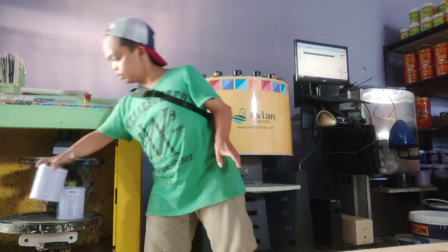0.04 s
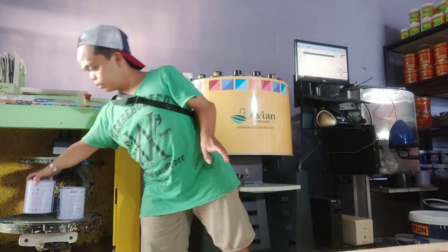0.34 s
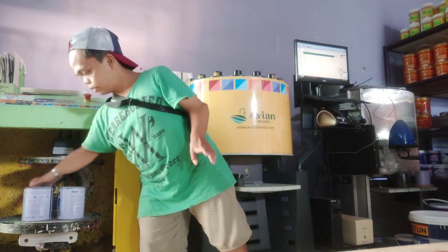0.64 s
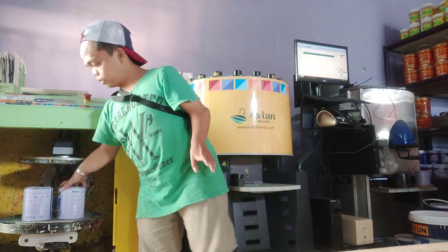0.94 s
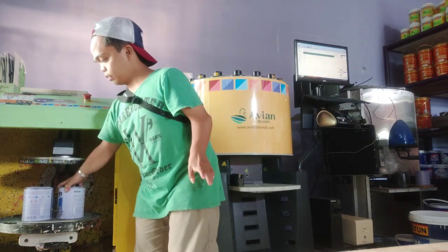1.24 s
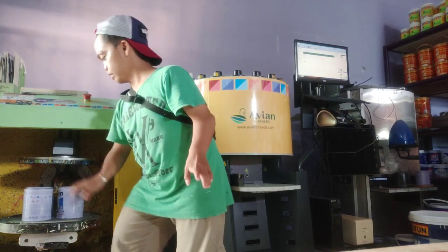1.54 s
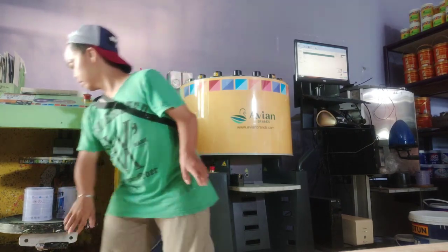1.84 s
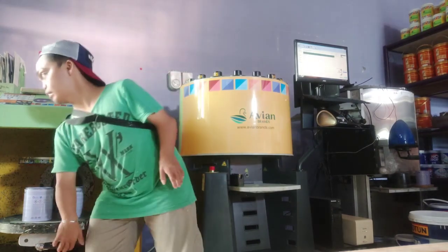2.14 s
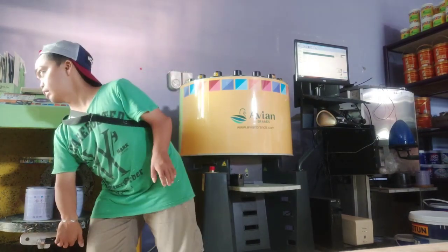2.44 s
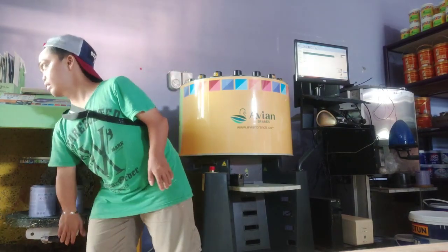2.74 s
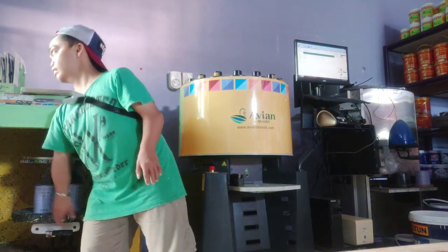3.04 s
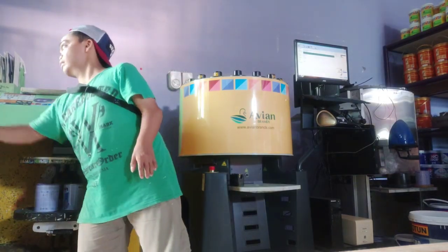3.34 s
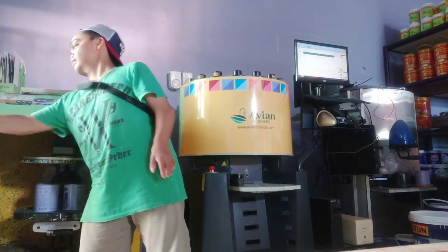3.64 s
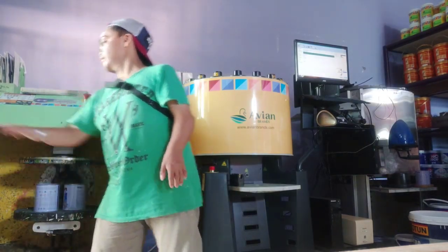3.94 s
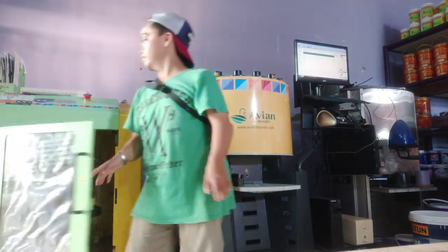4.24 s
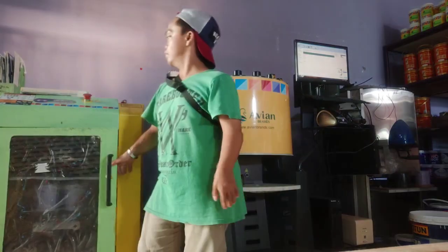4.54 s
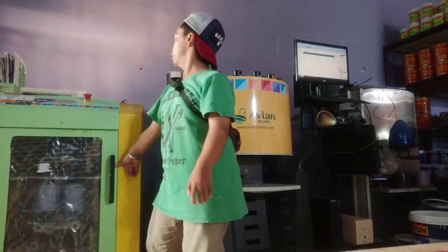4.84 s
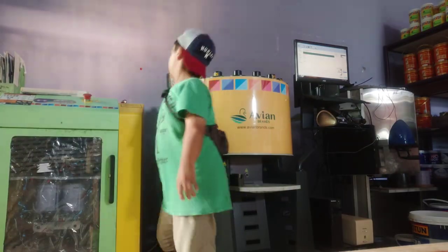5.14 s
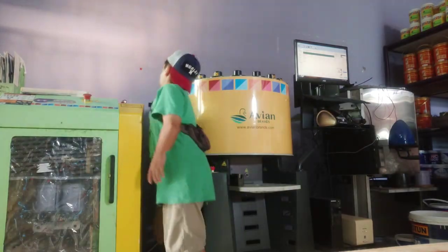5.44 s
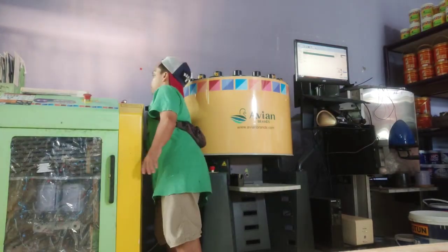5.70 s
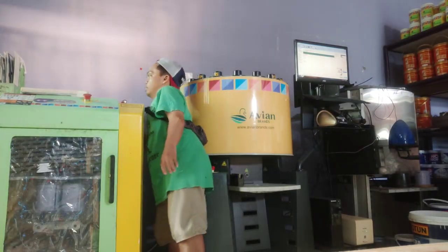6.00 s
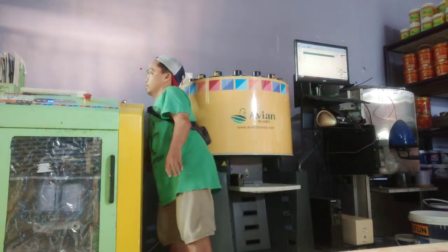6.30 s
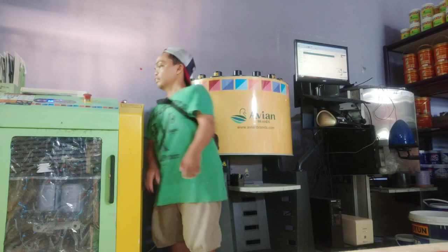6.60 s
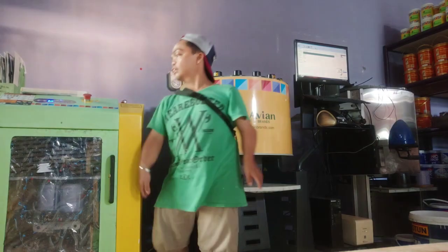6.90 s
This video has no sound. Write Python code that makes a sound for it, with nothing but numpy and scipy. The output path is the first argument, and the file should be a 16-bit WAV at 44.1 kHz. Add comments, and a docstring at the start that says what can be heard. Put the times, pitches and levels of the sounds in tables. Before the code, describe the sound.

A paint can clanks onto a steel plate, a clamp screws down and bangs tight, then a metal door slams and a switch clacks.

```python
"""A paint can clanks onto the steel plate of a shaker in a hard-walled shop. The clamp screw hums and
rasps as it is wound down, its loose handle clinks, and the clamp bangs tight. The sheet-metal door
slams, then a switch squeaks and clacks behind the machine. Each blow is a noisy clash over ringing modes.
Small birds chirp faintly outside, clothes rustle, and a noise suppressor pulls the quiet parts down."""
import sys
import numpy as np
from scipy import signal
from scipy.fft import rfft, irfft
from scipy.io import wavfile
from scipy.ndimage import uniform_filter1d

SR = 44100
rng = np.random.default_rng(int(sys.argv[2]) if len(sys.argv) > 2 else 0)


def put_to_file(sound):
    """Save the sound as 16-bit audio at rate SR, in the file named by the first command-line argument."""
    columns = np.atleast_2d(sound).T  # one column per channel
    safe = np.clip(columns, -1, 1)
    whole_steps = np.round(safe * 32767)
    wavfile.write(sys.argv[1], SR, whole_steps.astype(np.int16))


N = 315756
TIME = np.arange(N) / SR
RING = np.arange(2 * SR) / SR  # time after a blow

# Knocks of the clamp and clacks of the switch: t/s, level/dB, thud/dB, brightness/dB
CLAMP_KNOCKS = [(2.604, -28, -2, 10.5), (2.622, -33.5, 10, 2.5), (3.2255, -14.5, -10.5, -0.5),
                (3.241, -17.5, 2, -1.5)]
SWITCH_CLACKS = [(6.119, -39, -1.5, 5), (6.131, -32, -7, 2), (6.141, -34.5, 13, 0.5)]


def amp(db):
    """Decibels to gain."""
    return 10 ** (np.asarray(db) / 20)


def along(points, hz):
    """Read (f/Hz, value) points on a log frequency axis."""
    f, v = np.transpose(points)
    return np.interp(np.log(hz + 1), np.log(f + 1), v)


def wobble(rate, size):
    """A random curve with `rate` knots a second."""
    knots = rng.standard_normal(4096)
    return np.interp(np.arange(size) * rate / SR, np.arange(len(knots)), knots)


def swell(start_s, hold_s, attack_s, release_s):
    """Envelope that climbs 60 dB over the attack, holds from start_s and falls 60 dB over the release."""
    t = TIME - start_s
    return amp(-60 * (np.maximum(-t, 0) / attack_s + np.maximum(t - hold_s, 0) / release_s))


def add(track, s, sound):
    """Mix a sound into the track at time s."""
    part = track[round(s * SR):][:len(sound)]
    part += sound[:len(part)]


def coloured(x, spectrum, tilt=((1, 0), (2, 0)), size=8192):
    """Minimum-phase EQ: the spectrum scaled to unit energy, then tilted."""
    hz = np.fft.rfftfreq(size, 1 / SR)
    shape = amp(along(spectrum, hz))
    gain = shape / np.sqrt(np.mean(shape ** 2) + 1e-20) * amp(along(tilt, hz))
    cepstrum = irfft(np.log(gain + 1e-6))
    fold = np.r_[1, np.full(size // 2 - 1, 2), 1, np.zeros(size // 2 - 1)]
    impulse = irfft(np.exp(rfft(cepstrum * fold)))
    return signal.fftconvolve(x, impulse)[:len(x)]


def in_shop(x, wet_db):
    """Add the reverb of the hard walls, in which each frequency dies at its own speed."""
    # Reverb decay: f/Hz, t60/s
    decay = [(80, 1.7), (220, 0.66), (560, 0.84), (1500, 0.94), (4000, 0.96), (8000, 1.02), (15000, 0.55)]
    hz, t, noise = signal.stft(rng.standard_normal(3 * SR // 2), SR, nperseg=256)
    tail = signal.istft(noise * amp(-60 * t / along(decay, hz)[:, None]), SR, nperseg=256)[1]
    tail *= 1 - np.exp(-np.arange(len(tail)) / SR / 0.0014)  # the echoes take a moment to build up
    return x + amp(wet_db) * signal.fftconvolve(x, tail / np.linalg.norm(tail))[:len(x)]


def ring(modes, tilt, waver=0.7, scatter_db=1):
    """Clear modes, at new strengths for each blow, wavering as they fade."""
    out = np.zeros(len(RING))
    for hz, db, t60 in modes:
        level = db + along(tilt, hz) + scatter_db * rng.standard_normal() - 60 * RING / t60
        phase = 2 * np.pi * (hz * RING + rng.random()) + waver * wobble(35, len(RING))
        tremolo = 1 + waver * wobble(25, len(RING))
        attack = 1 - np.exp(-RING * hz / 2)
        out += amp(level) * tremolo * np.sin(phase) * attack
    return out


def blows(hits, colour, modes, clash_t60, ring_db, wet_db):
    """Each contact is a short clash of dense modes, echoed by the shop, over the body's clear modes."""
    track = np.zeros(N)
    for s, db, thud_db, bright_db in hits:
        # heavy contacts push more bass, hard ones reach further into the treble
        tilt = [(170, thud_db), (400, 0.0045), (1100, 0.022), (4000, 0.77 * bright_db), (10000, bright_db)]
        burst = rng.standard_normal(len(RING)) * amp(-60 * RING / clash_t60)
        clash = in_shop(coloured(burst, colour, tilt), wet_db)
        add(track, s, amp(db) * (clash + amp(ring_db) * ring(modes, tilt)))
    return track


def air(level_db=-64):
    """Room tone: the steady hiss of the shop's air."""
    # Hiss colour: f/Hz, level/dB
    colour = [(25, -24.5), (55, -13), (110, -7), (200, -3), (650, -6), (1000, -7.5), (1600, -16.5),
              (2200, -19), (4000, -14), (6000, -24), (7500, -12), (9500, -25), (12000, -22.5),
              (15500, -30.5)]
    return coloured(rng.standard_normal(N), colour) * amp(level_db)


def chirp(length_s, hz, glide, quaver):
    """One whistled bird note; glide and quaver are fractions of its pitch."""
    size = int(length_s * SR)
    sweep = np.linspace(hz * (1 - glide / 2), hz * (1 + glide / 2), size)
    pitch = sweep * (1 + quaver * wobble(370, size))
    return np.hanning(size) * np.sin(2 * np.pi * np.cumsum(pitch) / SR)


def birds(twitter_notes=420):
    """Four birds repeat their short calls over a far, high twitter, heard mostly through the room."""
    # Calls of each bird: t/s, f/Hz, level/dB
    tsips = [(0.17, 6860, -56), (.73, 6810, -58.5), (4.64, 6850, -60.5), (5.245, 6770, -57.5)]
    whistles = [(.005, 5646, -69.5), (.05, 4073, -68), (1.169, 5780, -66.5), (3.859, 5653, -70.5),
                (5.34, 4945, -71), (5.40, 5740, -66), (6.44, 5495, -67), (6.741, 5665, -69),
                (6.85, 4820, -71.5), (7.018, 4450, -69)]
    peeps = [(.33, 2287, -70.5), (3.86, 2155, -65.5), (4.04, 2114, -66.5), (4.3, 2109, -65.5),
             (5.27, 2080, -61), (5.81, 2214, -69.5), (6.646, 2070, -67.5), (6.839, 2148, -65.5)]
    chirrups = [(1.48, 4467, -58.5), (1.525, 3844, -58), (1.685, 4150, -58)]
    track = np.zeros(N)
    for calls, length_s, glide, quaver in [(tsips, .045, .015, .016), (whistles, .12, .0083, .022),
                                           (peeps, .055, .056, .027), (chirrups, .07, -.18, .07)]:
        for s, hz, db in calls:
            add(track, s, amp(db) * chirp(length_s, hz, glide, quaver))
    for slot, (delay, height, faintness) in enumerate(rng.random((twitter_notes, 3))):
        note = chirp(length_s=.1, hz=6750 + 1650 * height, glide=0, quaver=.003)
        add(track, (slot + delay) / twitter_notes * N / SR, amp(-69 - 8 * faintness) * note)
    return in_shop(track, wet_db=4)


def can():
    """The paint can lands on the steel plate with a clank, then taps lightly."""
    # Contacts: t/s, level/dB, thud/dB, brightness/dB
    contacts = [(.449, -31, 3.5, -25), (.460, -17.5, -1.5, -15.5), (.475, -25.5, 15.5, -5),
                (.742, -52, -16, -13), (1.022, -51, -9.5, -18), (1.405, -56.5, -5, 5.5),
                (1.640, -51.5, 4, -15)]
    # Clash colour: f/Hz, level/dB
    colour = [(30, -50), (90, -26), (170, -18.5), (240, -13.5), (330, -3), (600, -5.5), (1050, -16.5),
              (1550, -13.5), (1750, -13.5), (2300, -4), (2600, -29.5), (3400, -21), (4100, -32.5),
              (5000, -55.5), (16000, -70.5)]
    # Ringing modes: f/Hz, level/dB, t60/s
    modes = [(359.5, -1, 0.6), (483, -2.5, 0.3), (597, -2, 0.66), (680, -14, 0.92), (870, -13, 0.2),
             (981, -9, .45), (1270, -25, 0.71), (1350, -8, 0.62), (1514, 1.5, 0.13), (1634, -11.5, 0.54),
             (2020, -18.5, 1.3), (2165, -15, 1.4), (2228, -13.5, 1.05), (2220, -20, 0.21), (2720, -17, 0.6),
             (3460, -26.5, 1.8), (3900, -30, 0.79)]
    return blows(contacts, colour, modes, clash_t60=0.064, ring_db=-12.5, wet_db=-3)


def clothes(crinkle_db=2):
    """Cloth brushes and crinkles with each reach or step of the worker."""
    # Brushes: t/s, length/s, level/dB
    brushes = [(1.07, 0.089, -64), (2.10, .18, -61), (4.422, .03, -59.5), (5.527, 0.16, -64),
               (6.882, .1, -81.5)]
    # Rustle colour: f/Hz, level/dB
    colour = [(200, -19.5), (3000, -1.5), (5500, -4), (8000, 1.5), (12500, -6.5), (15500, -8.5)]
    rustle = coloured(rng.standard_normal(N), colour)
    motion = sum(amp(db) * swell(s, length, attack_s=0.21, release_s=0.33) for s, length, db in brushes)
    return rustle * motion * amp(crinkle_db * wobble(90, N))


def screw(start_s=2.16, grit_db=3, coast_db_per_s=21, tighten_db_per_s=6.5):
    """The screw rubs unevenly: a fading hum while it coasts, a growing rasp once the clamp bears down."""
    # Friction colour: f/Hz, level/dB
    colour = [(30, -47.5), (95, -9.5), (140, -5.5), (188, 4), (270, -8.5), (385, 1.5), (550, -9.5),
              (1000, -11), (1500, -17), (2500, -23.5), (6000, -32.5), (16000, -67)]
    rubbing = rng.standard_normal(N) * amp(grit_db * np.tanh(wobble(70, N)))
    coasted_s = np.maximum(TIME - start_s, 0)
    pressed_s = TIME - CLAMP_KNOCKS[0][0]
    loaded = pressed_s > 0
    hum = coloured(rubbing * ~loaded, colour, tilt=[(185, 0), (290, -15)])  # duller without load
    hum *= amp(-42 - coast_db_per_s * coasted_s)
    rasp = coloured(rubbing * loaded, colour) * amp(-43 + tighten_db_per_s * pressed_s)
    return (hum + rasp) * swell(start_s, hold_s=1.3, attack_s=0.069, release_s=.8)


def handle():
    """The loose handle clinks as the clamp is wound down."""
    # Clinks: t/s, level/dB, thud/dB, brightness/dB
    clinks = [(2.180, -46.5, 1.5, 13.5), (2.298, -39.5, -6.5, -26), (2.481, -51.5, -6.5, -3),
              (2.534, -40.5, -11, -14), (2.560, -43, -9.5, -18), (2.859, -39, 4.5, -10),
              (2.924, -41.5, -3, -8), (2.985, -29.5, 1.5, 1.5), (3.599, -37.5, -8, 0),
              (3.871, -59.5, -1, -14)]
    # Clash colour: f/Hz, level/dB
    colour = [(30, -32.5), (160, -0.5), (270, -13), (480, -12.5), (660, 6.5), (800, -19), (1020, 0),
              (1350, -18), (1800, -4), (2800, -17.5), (3600, -13.5), (5500, -32), (7500, -16), (11000, -45),
              (15500, -47.5)]
    # Ringing modes: f/Hz, level/dB, t60/s
    modes = [(367, 1.5, 0.29), (617, 0, 0.45), (675, -5, 0.56), (900, -0.5, 0.78), (1003, -2, 0.17),
             (1360, -10.5, 0.48), (1600, -6, 0.41), (1990, -10, 0.13), (2170, -15, .45), (3550, -13, 0.34),
             (3390, -14.5, .7), (3620, -15, 0.28), (4520, -17.5, 0.37), (4680, -23.5, 1)]
    return blows(clinks, colour, modes, clash_t60=0.12, ring_db=-9, wet_db=-4)


def clamp():
    """The clamp meets the can with a double knock, then bangs tight."""
    # Clash colour: f/Hz, level/dB
    colour = [(30, -30), (90, -9), (260, 4), (450, -13), (750, -6.5), (1000, -1), (1250, -7), (1550, -7.5),
              (2300, -13), (3000, -10), (4500, -17.5), (6300, -20.5), (7200, -12), (9500, -15),
              (10700, -19), (11400, -11.5), (12400, -24), (13700, -15.5), (15500, -14)]
    # Ringing modes: f/Hz, level/dB, t60/s
    modes = [(95.6, -8, 2.0), (189.1, -5.5, 1.5), (234, -2.5, 0.34), (262.8, -2.5, 1.5),
             (354.4, -2.5, 0.57), (398, -3, 0.75), (501, -8, 0.62), (679, -6, 0.97), (932, 2, .85),
             (971, 3, .75), (1005, 2.5, .75), (1050, -2, .5), (1340, -13, .9), (1492, -9, 0.68),
             (1592, -10, 0.79), (1642, -8.5, 0.25), (1800, -16, .4), (2930, -18, .6), (4010, -19, 1.1),
             (4113, -20.5, 0.84), (8870, -18, .6), (9300, -17.5, 0.23), (15335, -19, .5)]
    return blows(CLAMP_KNOCKS, colour, modes, clash_t60=0.11, ring_db=-15, wet_db=0)


def door():
    """The sheet-metal door slams, rattles on its catch and rings low."""
    # Blows of door and catch: t/s, level/dB, thud/dB, brightness/dB
    hits = [(4.417, -59, -18.5, 13.5), (4.759, -36.5, -16, 7.5), (4.774, -20, -8, -0.5),
            (4.789, -19.5, 7, -2), (4.838, -25.5, -5, -3), (4.884, -28, 5, -8.5)]
    # Clash colour: f/Hz, level/dB
    colour = [(25, -36), (42, -31.5), (60, -19.5), (115, -15), (225, -7.5), (420, -3.5), (680, -5),
              (1000, -10), (1600, -18), (3600, -18.5), (6000, -29), (7200, -20.5), (10000, -26.5),
              (12500, -27.5), (15500, -24.5)]
    # Panel modes: f/Hz, level/dB, t60/s
    modes = [(60.4, -12, 0.34), (92, -24, 1.8), (134.3, -17, 1.8), (182.4, -8, 1.3), (236.8, 6, 0.51),
             (293.2, 1, 0.54), (347, 2.5, .7), (390, -5, .7), (397, 3, 0.61), (466, -1, 0.844),
             (624, -2, .75), (662, -2, .65), (1120, -16.5, .4), (1298, -7, 0.79)]
    return blows(hits, colour, modes, clash_t60=0.2, ring_db=-15.5, wet_db=-1)


def lever(lead_s=.02, level_db=-51.5, judder_db=3):
    """Dry metal sticks and slips ever harder until the switch snaps, making the lever squeak."""
    # Narrow resonances of the lever: f/Hz, level/dB
    colour = [(200, -35), (2400, -28), (2850, -6), (3200, -14), (3750, -3), (4050, -0.5), (4600, -22),
              (7500, -18.5), (12000, -27.5)]
    push = swell(SWITCH_CLACKS[0][0] - lead_s, hold_s=lead_s, attack_s=.18, release_s=.05)
    slips = rng.standard_normal(N) * push * amp(level_db + judder_db * wobble(190, N))
    return in_shop(coloured(slips, colour), wet_db=-7)


def switch():
    """The switch snaps over behind the machine: three quick contacts make one clack."""
    # Clash colour: f/Hz, level/dB
    colour = [(30, -41), (100, -24), (180, -1.5), (300, -1.5), (430, 4), (700, -1.5), (1050, -0.5),
              (1500, -9.5), (4000, -5.5), (5500, -14), (8300, -7), (12500, -15.5), (15500, -14)]
    # Ringing modes: f/Hz, level/dB, t60/s
    modes = [(200, -2, .6), (327, -7, .5), (410, -5, .55), (458, -7, .5), (620, -4, .5), (806, -7, .6),
             (1040, -1, .65), (2250, -10, .7), (3850, -5, .4), (8300, -9, .6)]
    return blows(SWITCH_CLACKS, colour, modes, clash_t60=0.12, ring_db=-13, wet_db=0.5)


def scene():
    """Can, clamp, door and switch in turn, over the shop's ambience, in mono."""
    impacts = can() + handle() + clamp() + door() + switch()
    friction = lever() + screw()
    ambience = birds() + air() + clothes()
    return (impacts + friction + ambience)[None]


def record(dry, margin_db=9, depth_db=12, top_hz=15620):
    """A noise suppressor ducks each band near its own noise floor; a steep low-pass cuts the top."""
    bands = signal.stft(dry, nperseg=512)[2]
    power = uniform_filter1d(np.abs(bands) ** 2, size=3, axis=1)  # smoothed over frequency
    power = np.abs(uniform_filter1d(power, size=5, axis=2))  # and over time
    floor = np.percentile(power, 20, axis=2, keepdims=True) + 1e-20
    quiet = 1 / (1 + (power / floor / amp(margin_db) ** 2) ** 2)
    ducked = signal.istft(bands * amp(-depth_db * quiet), nperseg=512)[1][:, :N]
    low_pass = 1 / (1 + (np.fft.rfftfreq(N, 1 / SR) / top_hz) ** 200)
    return irfft(rfft(ducked) * low_pass, N)


dry = scene()
out = record(dry)
put_to_file(out)
```